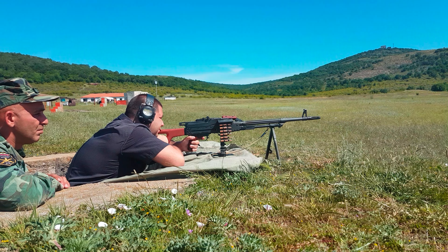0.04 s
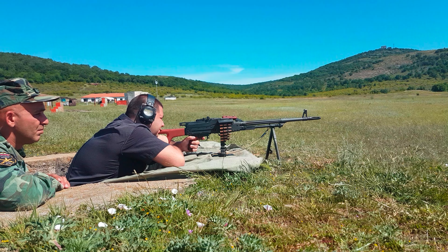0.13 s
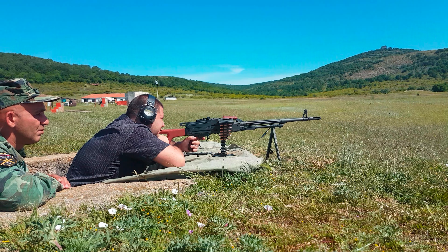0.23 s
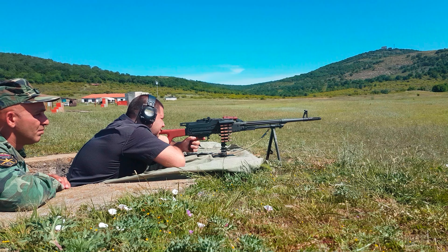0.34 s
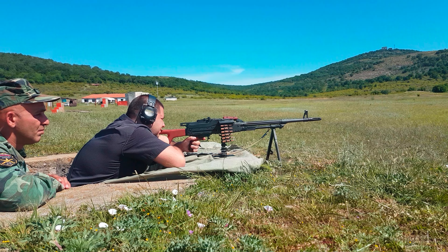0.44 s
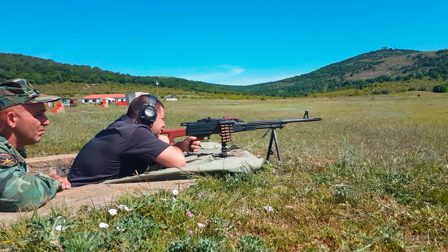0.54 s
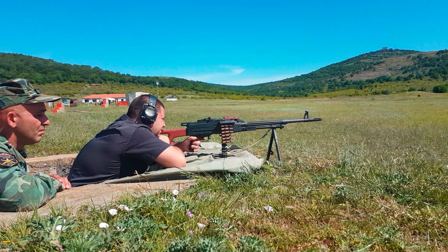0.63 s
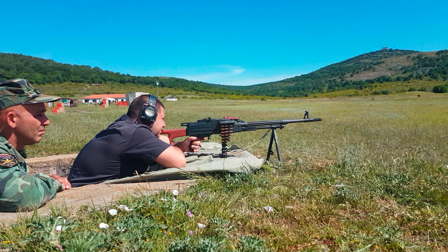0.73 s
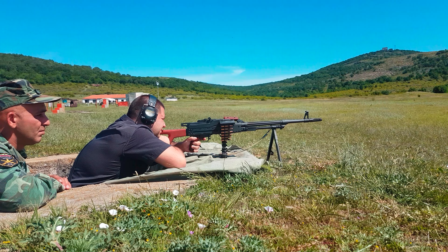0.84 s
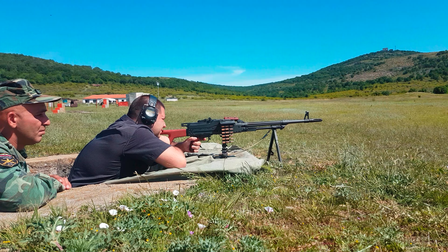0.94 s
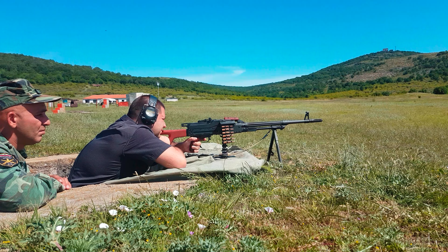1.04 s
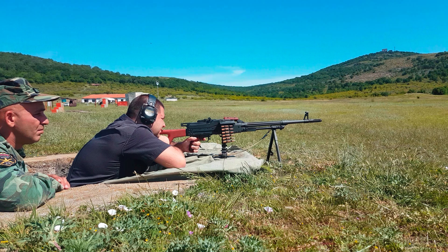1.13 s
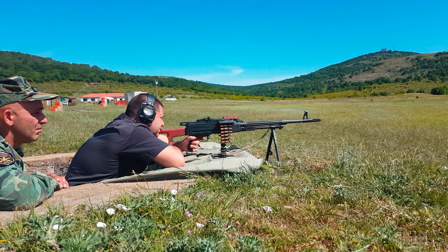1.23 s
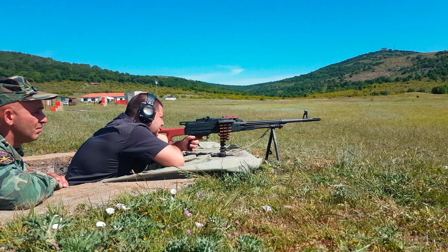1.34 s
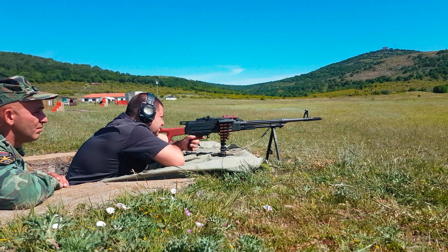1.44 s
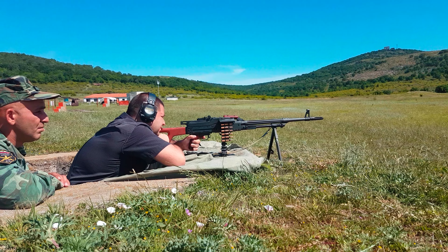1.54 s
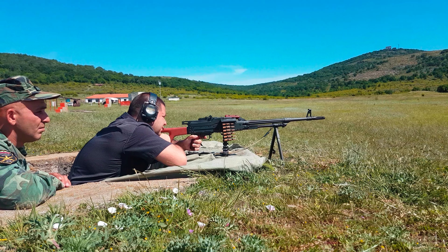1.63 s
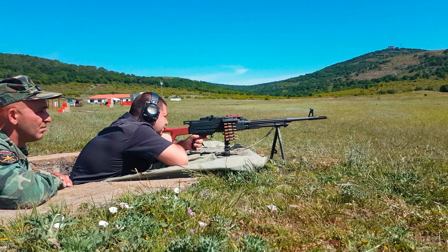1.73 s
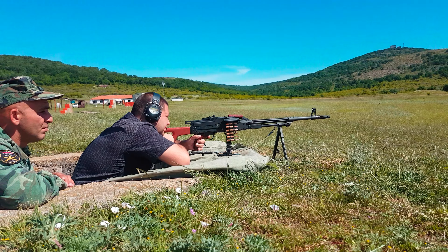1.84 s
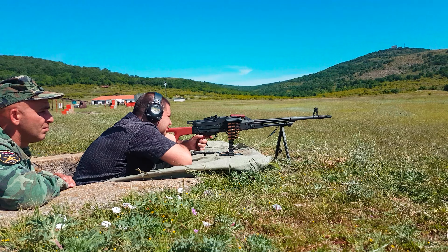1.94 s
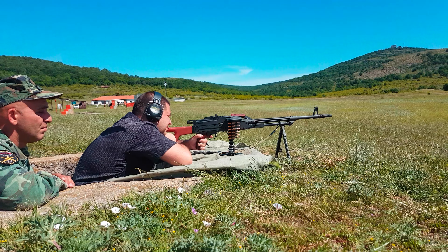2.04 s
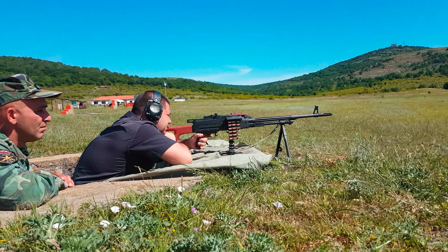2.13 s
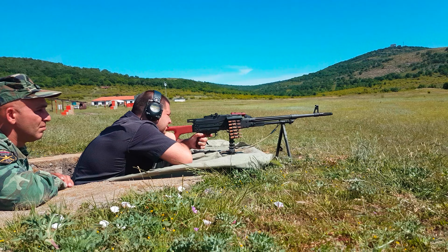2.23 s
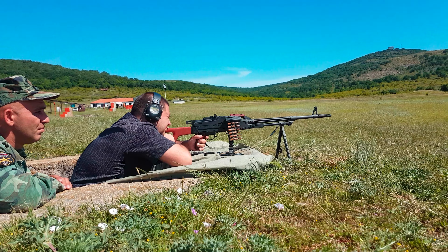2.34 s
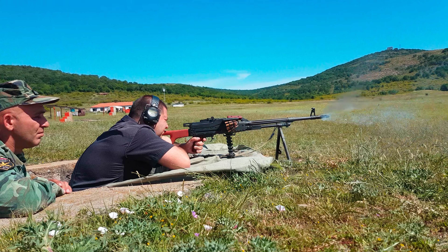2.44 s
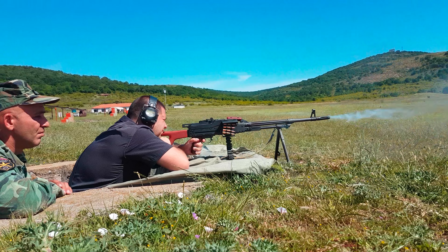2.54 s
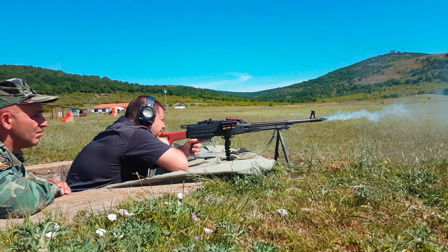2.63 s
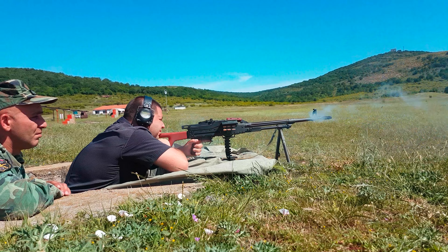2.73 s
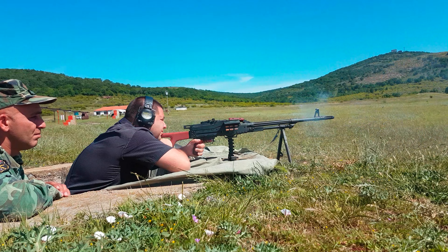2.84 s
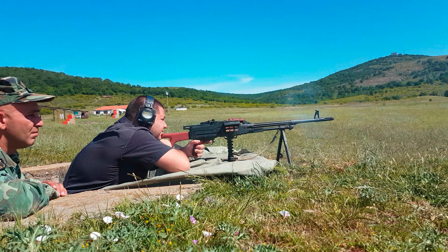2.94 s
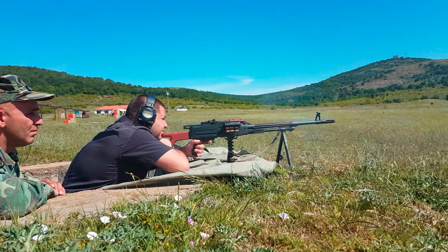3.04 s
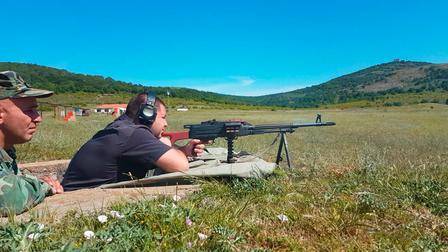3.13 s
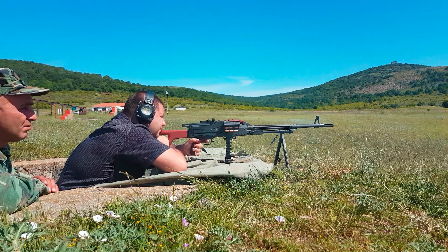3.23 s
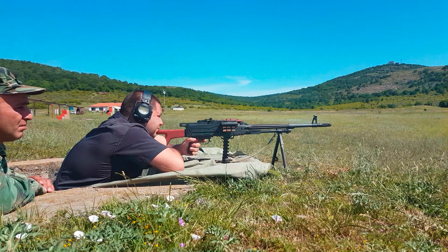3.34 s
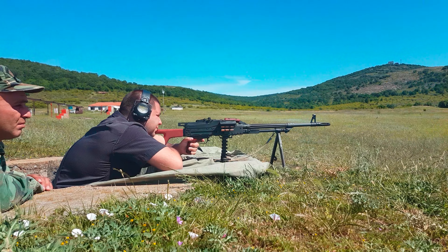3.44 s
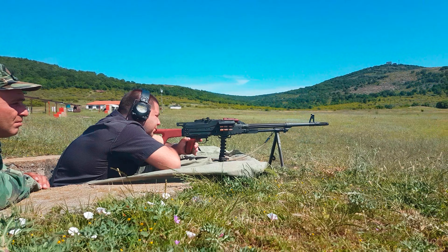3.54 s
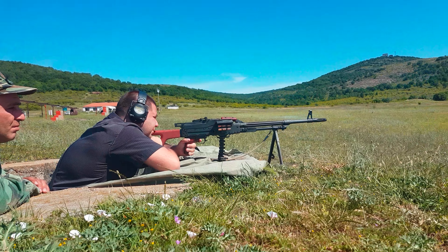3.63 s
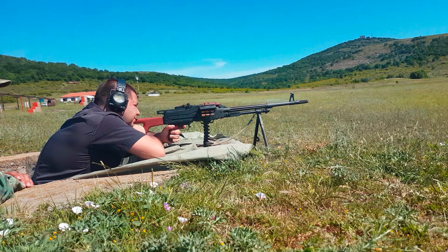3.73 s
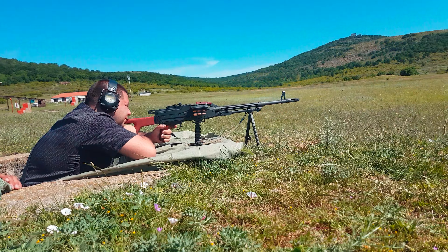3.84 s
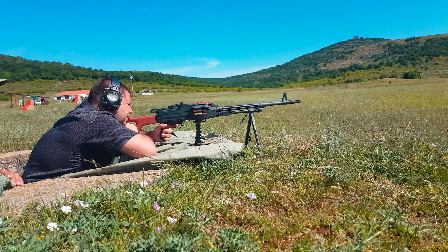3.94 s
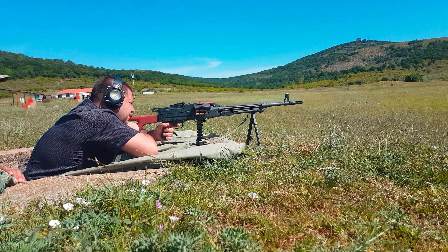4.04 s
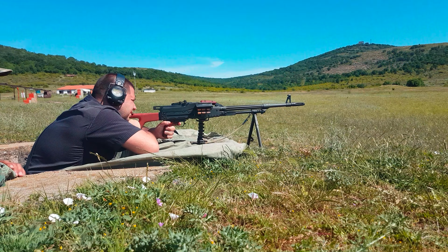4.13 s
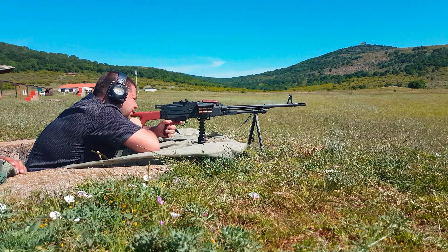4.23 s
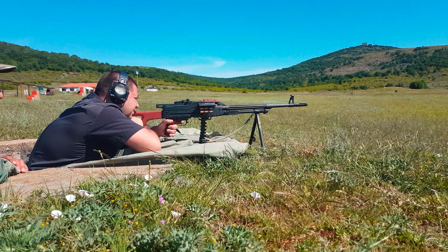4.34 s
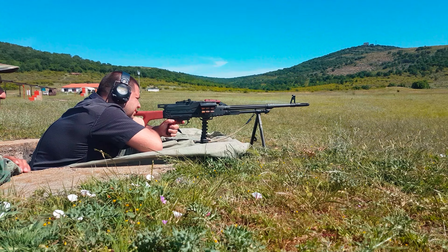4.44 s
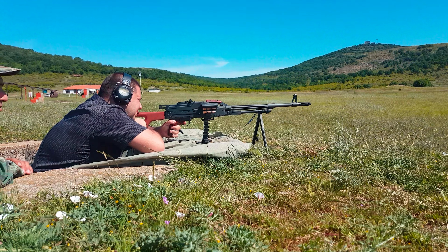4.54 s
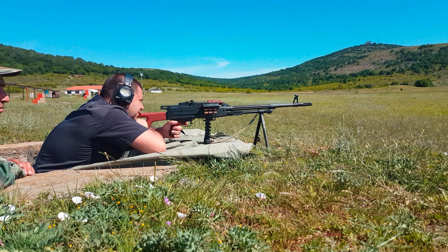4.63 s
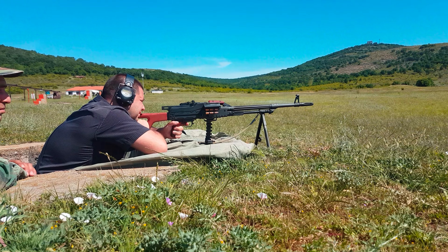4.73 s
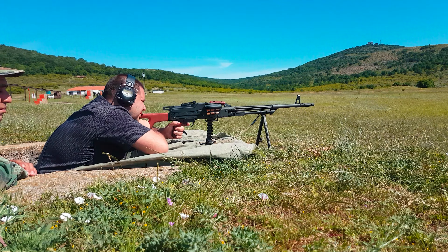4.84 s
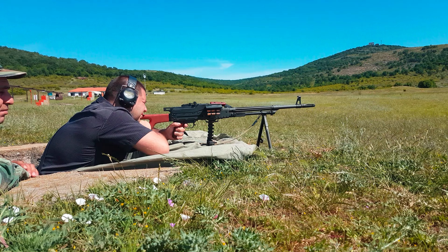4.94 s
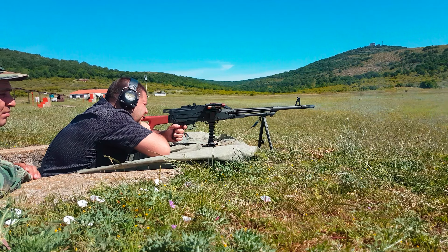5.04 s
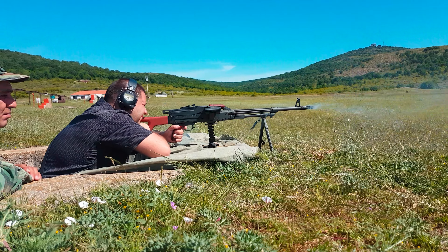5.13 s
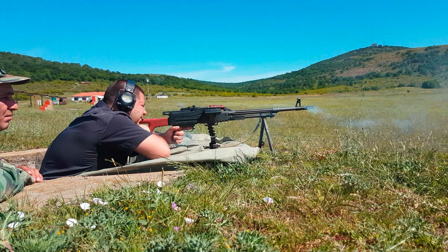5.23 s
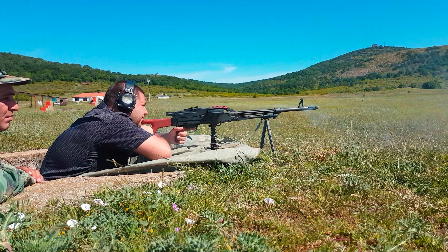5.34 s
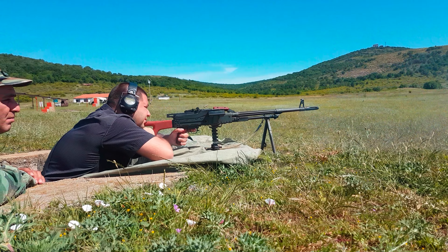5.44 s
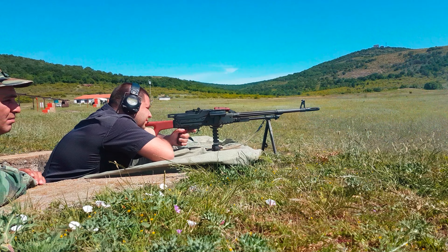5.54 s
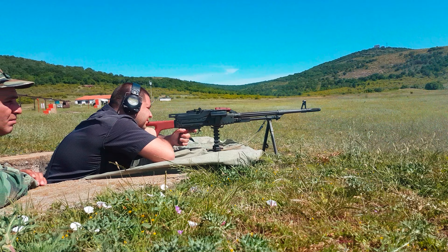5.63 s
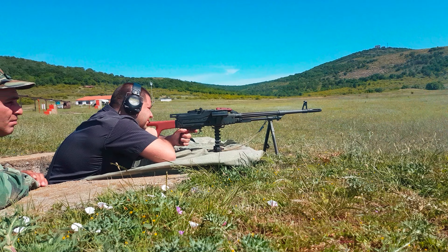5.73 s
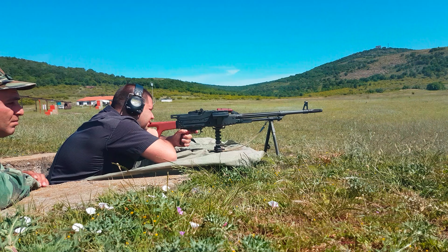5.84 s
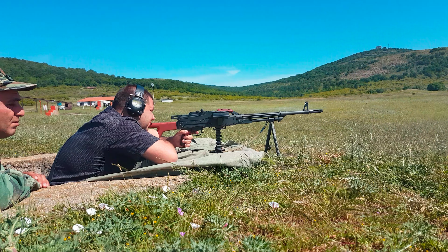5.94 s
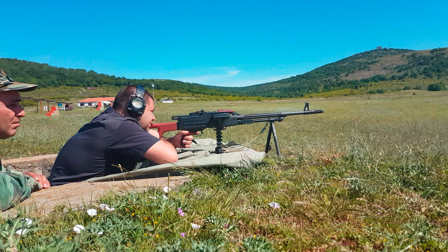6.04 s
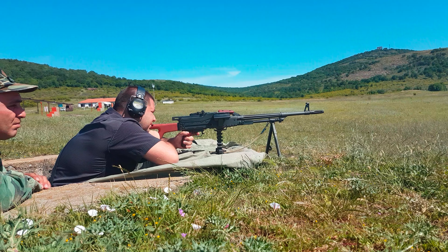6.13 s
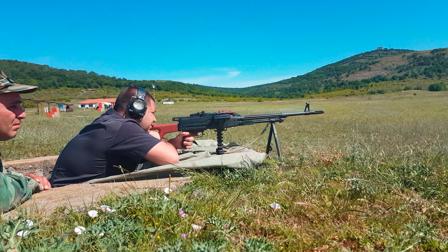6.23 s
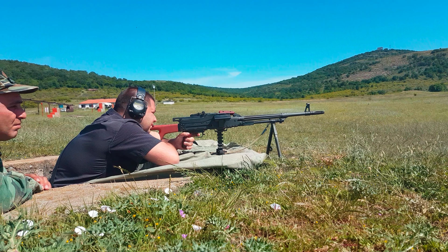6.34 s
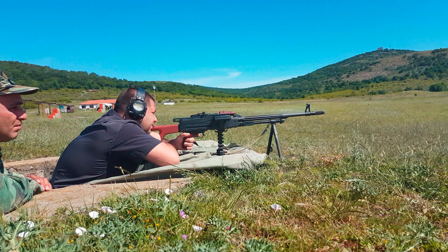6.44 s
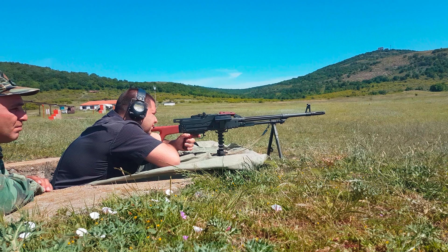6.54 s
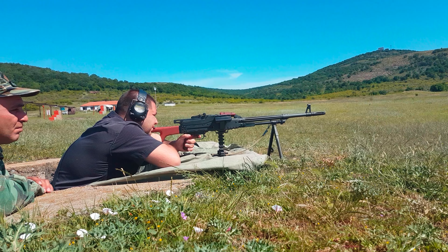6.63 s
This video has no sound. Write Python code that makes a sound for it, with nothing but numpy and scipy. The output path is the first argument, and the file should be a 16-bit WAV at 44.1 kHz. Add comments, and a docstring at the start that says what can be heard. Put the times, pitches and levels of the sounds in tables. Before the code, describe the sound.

An open shooting range in a valley, heard in stereo from a few metres beside a belt-fed machine gun. At the start a thin, high steel ring dies away over fluttering, rolling gunfire echoes and uneven low wind thumps, mostly on the right. A dull far shot knocks at 1.25 s; rough close scrapes follow around 1.5-2.1 s. At about 2.4 s the bolt slams forward and four shots crack within 0.3 s, roughly twelve a second, harsh and boomy, clipping, with close reflections, buffer clacks and bright ringing steel. A far bank answers about a third of a second later and the wash fades. From 3 to 4.4 s come small ticks and soft cloth swishes. Another far shot at 4.8 s, then a three-shot burst at 5.07-5.24 s rings out with ticks. Fainter far shots sound near 5.9 and 6.15 s as the roar swells again.

```python
"""Wind thumps both microphone ports while a steel ring dies away and gunfire rolls on in the valley.
Single shots come from afar, and rough scrapes and a rustle of cloth sound close by.
Then a belt-fed machine gun fires a short burst a few metres away: its bolt runs home, noise and low swings
make each blast, walls close by and a far bank answer, and a steel part rings on. Small ticks follow.
A second short burst and more far shots come later; the loudest peaks clip."""
import sys
import numpy as np
from scipy.fft import rfft, irfft, next_fast_len
from scipy.io import wavfile
from scipy.ndimage import uniform_filter1d, map_coordinates

SR = 44100
rng = np.random.default_rng(int(sys.argv[2]) if len(sys.argv) > 2 else 0)


def master(y):
    """Save y as 16-bit WAV."""
    cut = np.clip(np.atleast_2d(y).T, -1, 1)
    pcm = np.round(cut * 32767)  # scale
    wavfile.write(sys.argv[1], SR, pcm.astype(np.int16))


N = 295029  # length in samples
LAG, BOOM_LAG = 0.000397, .0003  # the gun reaches the left port first; low swings lag less (s)

# In the tables "fade" is the time a sound takes to fall by 60 dB.
# A "colour" says how strong a noise is at each pitch. Each row: pitch in Hz, relative level in dB.


def amp(db):
    """Turns decibels into a plain factor."""
    return 10 ** (np.asarray(db) / 20)


def unit(x):
    """Scales a signal to an rms of 1."""
    return x / np.sqrt(np.mean(x ** 2) + 1e-20)


def pan(db):
    """Left and right gains for a left-right difference; a positive one leans left."""
    return amp([db / 2, -db / 2])


def curves(rows):
    """One value per sample for each column after the time."""
    s, *columns = np.transpose(rows)
    return [np.interp(np.arange(N) / SR, s, column) for column in columns]


def wobble(rate):
    """A smooth random curve per channel, rate knots a second."""
    knots = rng.standard_normal((2, int(N * rate / SR) + 4))
    places = np.arange(N) * rate / SR
    return np.array([map_coordinates(row, [places]) for row in knots])


def filtered(x, response):
    """x times a complex response of frequency."""
    m = next_fast_len(N + SR // 4)  # room to spare, so that the end does not wrap to the start
    return irfft(rfft(x, m) * response(np.fft.rfftfreq(m, 1 / SR)), m)[..., :N]


def rush(spectrum, alike, lag=0, lumps=1):
    """Stereo noise of rms 1 with a colour, a left-right likeness and a delay of the right side (s)."""
    f, db = np.transpose(spectrum)
    turn = np.arccos(np.clip(alike, -1, 1)) / 2
    a, b = rng.standard_normal((2, N))
    shared, differing = np.cos(turn) * a, np.sin(turn) * b
    pair = lumps * np.array([shared + differing, shared - differing])

    def response(hz):
        colour = amp(np.interp(np.log(hz + 1), np.log(f + 1), db, -120, -120))
        return colour * np.exp(-2j * np.pi * np.outer([0, lag], hz))

    return unit(filtered(pair, response))


def add(out, s, sound):
    """Mixes a sound in at time s."""
    i = round(s * SR)
    part = sound[..., max(-i, 0):max(N - i, 0)]
    out[..., max(i, 0):max(i, 0) + part.shape[-1]] += part


def puffs(rows):
    """The envelope of noise bursts (s, dB, rise s, fade s), whose powers add."""
    power = np.zeros(N)
    for s, db, rise, fade in rows:
        t = np.arange(int(fade * SR * 2)) / SR
        add(power, s, (amp(db - 60 * t / fade) * (1 - np.exp(-t / rise))) ** 2)
    return np.sqrt(power)


def ring(modes, rise, length):
    """Damped sines (Hz, dB, fade s) that start from rest."""
    t = np.arange(int(length * SR)) / SR
    sines = sum(amp(db - 60 * t / fade) * np.sin(2 * np.pi * hz * t) for hz, db, fade in modes)
    return sines * (1 - np.exp(-t / rise))


def strokes(rows, size):
    """The envelope of steady strokes (start s, end s, dB) with edges size samples long."""
    t = np.arange(N) / SR
    steps = sum(amp(db) * ((t > start) & (t < end)) for start, end, db in rows)
    return uniform_filter1d(steps, size=size)


# The near gun's shots. Each row: start in seconds, level of the shot in dB, level of its steel ring in dB,
# extra dB for the upper tones of that ring.
SHOTS = [(2.4374, -1.5, -26, 3), (2.5256, -5.5, -31, -3), (2.611, -6.5, -32, -6.5), (2.696, -6, -28, 0.5),
         (5.069, -2, -26, 2.5), (5.152, -6, -26.5, -1.5), (5.2378, -6.5, -24.5, 9)]


def bursts():
    """Times of the first and of the last shot of each burst; over half a second of pause parts two bursts."""
    s = np.array([row[0] for row in SHOTS])
    pause = np.diff(s) > .5
    return s[np.r_[True, pause]], s[np.r_[pause, True]]


def train(parts):
    """The envelope of all shots, each made of the same parts (delay s, dB, rise s, fade s)."""
    return puffs([(s + delay, db + level, rise, fade)
                  for s, db, *_ in SHOTS for delay, level, rise, fade in parts])


def gritty(depth_db, rate):
    """Quick random ups and downs that roughen the noise of a shot."""
    return amp(2.3 * wobble(500) + depth_db * wobble(rate))


# Tones of the steel part. Each row: pitch in Hz, level in dB, fade in seconds.
STEEL_TONES = [(7424, -13, .5), (7457, -16, .75), (7566, 0, .66), (8247, -12, .52), (8882, -8, .48),
               (9950, -10, .1), (15110, -16, .34)]
# A ring still dying at the start: time in seconds, level in dB, extra dB for the upper tones.
EARLIER_RING = (-0.49, -39, 0)


def steel_ring():
    """The recoiling bolt strikes a steel part; the next blow stops the ring and starts it anew."""
    tone = np.zeros(N + 2 * SR)
    blows = [EARLIER_RING] + [(s + .025, db, upper_db) for s, _, db, upper_db in SHOTS]
    for s, db, upper_db in blows:
        modes = [(hz, db + level + upper_db * (hz > 8500), fade) for hz, level, fade in STEEL_TONES]
        blow = ring(modes, 0.014, 1.5)
        i = round(s * SR)
        tone[max(i, 0):i + len(blow)] = blow[max(-i, 0):]  # replaces the old ring
    late = np.roll(tone, round(LAG * SR))
    return pan(2)[:, None] * amp(1.9 * wobble(51)) * np.array([tone[:N], late[:N]])


# The roar's loudness. Each row: time in seconds, then the levels of the middle, upper and lower band in dB.
ROLL = [(0, -47.5, -59.5, -56), (.25, -53.5, -68, -64.5), (.75, -56, -70, -61), (1.01, -54.5, -68.5, -54.5),
        (1.23, -57.5, -71, -63), (1.3, -47, -57, -56), (1.73, -49.5, -57, -52.5), (2.35, -58.5, -72, -55.5),
        (2.82, -44, -53, -58), (3.14, -62.5, -64.5, -64), (3.44, -57, -66, -63), (3.74, -46.5, -57, -51),
        (4.02, -50.5, -62.5, -63.5), (4.3, -45, -63.5, -71), (4.85, -49.5, -61.5, -56),
        (5.36, -53.5, -50.5, -61.5), (5.75, -63.5, -67, -66.5), (6.05, -54, -64, -55.5),
        (6.36, -42, -52.5, -50), (6.69, -46.5, -57, -52.5)]
# The middle band drifts upward, then sinks partway back near the end. Each row: time in seconds,
# share of the higher colour from 0 to 1.
LIFT = [(0, .05), (2.2, .15), (2.9, .6), (4.5, .7), (5.6, .95), (6.3, .5), (6.69, .5)]
# Colours of the middle band and of the same band lying higher. Each row: pitch in Hz, relative level in dB.
MIDDLE, LIFTED = [(1050, -33), (1450, -7), (2000, -4), (2450, -6), (2800, -19)], [(1250, -35.5), (1700, -8), (2200, -2.5), (2800, -4), (3150, -19)]
# Colours of the upper and the lower band. Each row: pitch in Hz, relative level in dB.
UPPER, LOWER = [(1760, -33.5), (3000, -3.5), (4150, -11), (6200, -27), (8000, -39.5), (10400, -68.5),
                (17600, -120)], [(290, -40), (500, -12.5), (792, -9), (1500, -4), (1950, -26.5), (3300, -120)]
VALLEY_LAG = -.00045  # the roar reaches the right port first (s)


def valley():
    """Echoes of gunfire smear into a fluttering roar of three noise bands."""
    middle_db, upper_db, lower_db = curves(ROLL)
    lift = np.clip(curves(LIFT)[0], 0, 1)
    middle = np.sqrt(1 - lift) * rush(MIDDLE, 0.5, VALLEY_LAG)
    middle += np.sqrt(lift) * rush(LIFTED, 0.5, VALLEY_LAG)
    upper = rush(UPPER, 0.21, VALLEY_LAG)
    lower = rush(LOWER, 0.2, VALLEY_LAG, lumps=amp(2.4 * wobble(60)))
    roar = amp(middle_db) * middle + amp(upper_db) * upper + amp(lower_db) * lower
    flutter = amp(1.2 * wobble(40) + 1.7 * wobble(150))
    return pan(5.2)[:, None] * flutter * roar


# The wind's strength. Each row: time in seconds, level in dB, left-right difference in dB.
WIND = [(0, -53, -12), (.08, -45, -14), (.26, -51, -15), (.52, -46, -12), (.65, -50, -16),
        (1.15, -41, -17.5), (1.22, -43.5, -14), (1.3, -33, -14), (1.45, -47.5, -10.5), (1.64, -50, -0.5),
        (1.75, -44, -17.5), (2.35, -50.5, -7), (2.92, -49, -4.5), (3.2, -67.5, 0), (3.89, -51.5, -11.5),
        (4.12, -57, -2.5), (4.5, -39, -6.5), (4.77, -47, -1.5), (4.97, -38.5, -6), (5.45, -53.5, 4.5),
        (5.85, -65, -9.5), (6.16, -52.5, -2), (6.42, -53.5, -12), (6.69, -58, -8.5)]
# Colour of the wind. Each row: pitch in Hz, relative level in dB.
RUMBLE = [(15, -53.5), (25, -14), (65, 3.5), (128, 2.5), (334, -4), (534, -12.5), (1200, -16.5),
          (1560, -38), (2640, -120)]


def wind():
    """Eddies thump each port on its own: a dense train of uneven pops swells a low rumble."""
    buffet_db, side_db = curves(WIND)
    pops = (rng.random((2, N)) < 120 / SR) * rng.uniform(.3, 1, (2, N))  # about 120 a second
    lumps = (unit(uniform_filter1d(pops, size=60)) + .8) * amp(2.2 * wobble(25))
    return amp(buffet_db) * pan(side_db) * rush(RUMBLE, 0.34, lumps=lumps)


# Colour of the hiss. Each row: pitch in Hz, relative level in dB.
HISS = [(3530, -28.5), (6000, -0.5), (8150, -9), (10700, -7.5), (13200, -3), (15600, -1.5)]
HISS_DB = -73
SINK_DELAY, SINK_DB, SINK_RECOVERY = .2, -11.5, .5  # s after a burst, depth in dB, recovery time in s


def hiss():
    """A faint steady top end that drops away after a burst and creeps back."""
    since = np.arange(N) / SR - SINK_DELAY - bursts()[1][:, None]
    sunk = np.sum((since > 0) * np.exp(-np.abs(since) / SINK_RECOVERY), axis=0)
    return amp(HISS_DB + SINK_DB * sunk) * rush(HISS, 0)


# Single far shots and their slaps. Each row: start in seconds, level in dB.
FAR = [(1.243, -9), (1.28, -27), (1.306, -26.5), (1.455, -35.5), (3.252, -43.5), (4.696, -43.5),
       (4.794, -13.5), (4.822, -26.5), (5.879, -30), (5.981, -43), (6.054, -42.5), (6.067, -37),
       (6.15, -19.5), (6.215, -32)]
# Tones of the dull swing. Each row: pitch in Hz, level in dB, fade in seconds.
FAR_SWING = [(577, -3, 0.014), (935, -5.5, 0.014), (1278, -1, .018), (1705, -10.5, 0.024)]
# Colour of the short wash. Each row: pitch in Hz, relative level in dB.
SLAP = [(120, -44), (200, -23.5), (505, -2), (778, -10), (894, -16.5), (1010, -5), (1360, -9.5),
        (4450, -28.5), (8000, -47), (10400, -93), (17600, -120)]
BANK_DELAY, BANK_DB = .343, -31  # a far bank answers every near shot: delay in s, dB under the shot
FAR_WASH_DB, FAR_WASH_FADE = -11, .12  # dB under the far shot's level, fade in s


def far_shots():
    """Distance leaves a dull swing and a short wash; the bank's answers sound alike."""
    heard = FAR + [(s + BANK_DELAY, db + BANK_DB) for s, db, *_ in SHOTS]
    out = puffs([(s, db + FAR_WASH_DB, .001, FAR_WASH_FADE) for s, db in heard]) * rush(SLAP, 0.21)
    for s, db in heard:
        modes = [(hz * rng.normal(1, .03), db + level, fade) for hz, level, fade in FAR_SWING]
        add(out, s + .0008, ring(modes, .0002, .05))  # the wash leads the swing a little
    return out


# Rough swells. Each row: start in seconds, end in seconds, level in dB.
SCRAPES = [(1.515, 1.585, -43.5), (1.615, 1.71, -44.5), (1.86, 1.94, -55), (2.04, 2.11, -47.5),
           (3.745, 3.8, -47.5)]
# Colour of the swells. Each row: pitch in Hz, relative level in dB.
ROUGH = [(800, -33), (1200, 4.5), (2000, 4), (2900, -4), (4200, -6), (5200, -27), (6500, -48)]


def scrapes():
    """Rough swells close by: soft-edged strokes of lumpy noise."""
    return strokes(SCRAPES, size=500) * rush(ROUGH, 0.11, lumps=amp(2.7 * wobble(150)))


# Swishes of cloth. Each row: start in seconds, end in seconds, level in dB.
SWISHES = [(2.04, 2.058, -65), (3.254, 3.3, -76.5), (3.32, 3.406, -68), (3.526, 3.604, -56.5),
           (3.626, 3.686, -62), (3.741, 3.871, -57.5), (4.183, 4.199, -66), (4.405, 4.42, -51.5),
           (4.972, 4.982, -48.5)]
# Colour of the cloth. Each row: pitch in Hz, relative level in dB.
CLOTH = [(2060, -2.5), (3500, -0.5), (5950, -26), (6290, -22), (11500, -17), (12900, -12), (15600, -20.5)]


def cloth():
    """Brief swishes of cloth on the right: unsteady strokes of bright noise."""
    return pan(-17.5)[:, None] * strokes(SWISHES, size=200) * amp(1.6 * wobble(70)) * rush(CLOTH, .1)


# The low rumble of each shot: delay in seconds, level in dB, rise in seconds, fade in seconds.
THUD = (-0.11, -21, 0.57, .5)
# Colour of the rumble. Each row: pitch in Hz, relative level in dB.
DEEP = [(30, -26), (65, -4), (150, -6), (300, -2.5), (450, -7.5), (700, -34)]


def low_rumble():
    """Deep noise around each shot that begins just before it, swells slowly and lingers."""
    return train([THUD]) * rush(DEEP, 0.78, BOOM_LAG)


# Before a burst the bolt runs forward and strikes home. Each row: seconds from the first shot
# (negative is earlier), level in dB, fade in seconds.
RUN_UP = [(-.067, -22.5, .14), (-.05, -19, .13), (-.037, -14, .07), (-.02, -21, .07), (-.009, -5, .053)]
# Within a burst it strikes home more softly: seconds from the shot, level in dB, fade in seconds.
HOME = (-0.0062, -16.5, 0.13)
# Colour of the bolt's noise. Each row: pitch in Hz, relative level in dB.
STEEL = [(120, -49.5), (200, -20), (345, -21.5), (525, -2), (756, -12.5), (1950, -8), (2430, -8.5),
         (2810, -23.5), (3890, -2.5), (5030, -15.5), (6980, -11), (9340, -24.5), (15600, -16)]


def bolt_runs_home():
    """The bolt runs home before each shot: quick puffs of gritty metallic noise."""
    first = bursts()[0]
    moves = []
    for s, *_ in SHOTS:
        steps = RUN_UP if s in first else [HOME]
        moves += [(s + lead, db, .002, fade) for lead, db, fade in steps]
    return pan(3.9)[:, None] * puffs(moves) * rush(STEEL, 0.4, LAG, amp(2.2 * wobble(500)))


# Bright noise of one shot: muzzle crack, then a wall's answer. Each row: delay in seconds, level in dB,
# rise in seconds, fade in seconds.
CRACKS = [(0, 2, .0002, .012), (0, -3.5, .001, 0.067), (.004, 2.5, 0.005, 0.05), (.027, -5.5, 0.00072, .08),
          (0.036, -18, 0.0074, 0.33)]
# Colour of the crack. Each row: pitch in Hz, relative level in dB.
CRACK = [(180, -49), (300, -1), (893, -4), (1820, -3.5), (4290, -7.5), (5680, -10), (7520, -13),
         (8160, -16.5), (9950, -16.5), (13200, -6), (15600, -11.5)]


def cracks():
    """The sharp crack at the muzzle and its answer from a wall, as bright gritty noise."""
    return amp(-2.5) * pan(-1.5)[:, None] * train(CRACKS) * rush(CRACK, 0.1, LAG, gritty(2.7, 1500))


# Duller noise of one shot: the blast, its ground bounce, a wall's answer and the near wash. Each row:
# delay in seconds, level in dB, rise in seconds, fade in seconds.
BLASTS = [(0, -3.5, 0.00096, 0.13), (.012, 0.5, 0.0043, 0.066), (.027, -5, 0.0016, 0.056),
          (.03, -21.5, 0.012, 0.47)]
# Colour of the blast. Each row: pitch in Hz, relative level in dB.
BLAST = [(59, -35.5), (100, -12.5), (135, -30.5), (360, -6.5), (426, -10), (477, -9.5), (808, -10),
         (2450, -14.5), (6910, -25), (7320, -23.5), (9000, -32.5), (11700, -68.5), (19800, -120)]


def blasts():
    """The body of the blast and its first reflections, as duller gritty noise."""
    return pan(4.8)[:, None] * train(BLASTS) * rush(BLAST, 0.2, LAG, gritty(1.6, 150))


# Low swings that reach the ears one after another. Each row: delay in seconds, level in dB,
# pitch in Hz, fade in seconds, left-right difference in dB.
BOOMS = [(0, -9, 599.6, .015, -14.5), (.0095, 4.5, 388, 0.03, -1), (.0135, 1.5, 578.5, .04, 0),
         (0.021, -5, 456, 0.03, 7), (.027, -10, 371, 0.066, -8.5), (0.04, -4, 305.4, 0.049, 5.5),
         (.047, -13, 210, .06, 2), (.056, -20.5, 264.6, .1, 3.5), (.068, -22.5, 180.7, 0.12, 5.5),
         (.003, -29, 68, 0.25, -2.5)]


def booms():
    """Pressure swings after each shot: damped low sines whose pitch and level vary a little by chance."""
    out = np.zeros((2, N))
    for s, db, *_ in SHOTS:
        for delay, level, hz, fade, side_db in BOOMS:
            chance_hz, chance_db = rng.normal(0, [.015 * hz, 1.2])
            swing = amp(db + 1) * ring([(hz + chance_hz, level + chance_db, fade)], 0.002, .15)
            left, right = pan(side_db)
            add(out[0], s + delay, left * swing)
            add(out[1], s + delay + BOOM_LAG, right * swing)
    return out


# The bolt hits its buffer and two small rattles follow. Each row: seconds after the shot, level in dB.
STOPS = [(.0725, -9.5), (.131, -26), (.177, -28)]
# Tones of a hit. Each row: pitch in Hz, level in dB, fade in seconds.
BUFFER = [(1280, -6, 0.02), (2630, -9, .025)]
# Colour of a hit's noise. Each row: pitch in Hz, relative level in dB.
CLACK = [(290, -30.5), (500, -4.5), (2500, -1.5), (3630, -17.5), (6980, -13.5), (7510, -9), (9000, -18),
         (11700, -47.5), (19800, -120)]
CLACK_DB = -7  # the noise of a hit against the hit's level


def bolt_stops():
    """The bolt hits its buffer after every shot: a clack of noise and two damped tones."""
    hits = [(s + delay, db) for s, *_ in SHOTS for delay, db in STOPS]
    noise = puffs([(s, db + CLACK_DB, .0003, .04) for s, db in hits])
    out = pan(2.2)[:, None] * noise * rush(CLACK, 0.93, LAG)
    for s, db in hits:
        add(out, s, amp(db + rng.normal(0, 1.5)) * ring(BUFFER, .0003, .04))
    return out


# The long wash of each shot: delay in seconds, level in dB, rise in seconds, fade in seconds.
FIELD = (0.09, -38.5, 0.2, 1.53)
# Colour of the wash. Each row: pitch in Hz, relative level in dB.
WASH = [(800, -30), (1200, -9), (1700, -12), (2300, 0.5), (3300, -14), (4500, -4), (5400, -15), (6300, -11),
        (7200, -26), (9000, -50)]


def field_wash():
    """Each shot washes over the range: noise that swells slowly and fades in an uneven flutter."""
    return pan(3.2)[:, None] * train([FIELD]) * rush(WASH, 0.28, LAG, amp(3.8 * wobble(120)))


# Short mid ticks on the left. Each row: start in seconds, level in dB.
PATTER = [(3.076, -44), (3.138, -44.5), (3.161, -43), (3.189, -47), (3.223, -38), (4.089, -47),
          (5.362, -24.5), (5.598, -43), (5.68, -42), (5.703, -42), (5.762, -47.5)]
PATTER_HZ = 2240  # middle of the random pitches
MORE_FROM, MORE_TO = .2, 0.4  # more ticks, about as loud, scatter this long after each burst (s)
MORE_DB, MORE_SPREAD_DB = -43, 1


def patter():
    """Short mid ticks: four damped sines of random pitch each; eight more at random times after each burst."""
    out = np.zeros((2, N))
    more = [(s + rng.uniform(MORE_FROM, MORE_TO), rng.normal(MORE_DB, MORE_SPREAD_DB))
            for s in np.repeat(bursts()[1], 8)]
    for s, db in PATTER + more:
        pitches = PATTER_HZ * np.exp(rng.normal(0, 0.14, size=4))
        add(out, s, pan(4)[:, None] * ring([(hz, db, .01) for hz in pitches], 0.00072, .03))
    return out


# Bright ticks. Each row: start in seconds, level in dB, rough pitch in Hz, left-right difference in dB.
TICKS = [(2.9634, -40.5, 7580, -7), (3.7064, -45.5, 4750, 25), (3.7618, -38.5, 4000, -11),
         (3.954, -43.5, 5350, 5), (4.0286, -39, 8360, -13.5), (4.147, -35, 13100, -7),
         (4.2084, -35.5, 7010, -9), (4.301, -48, 6420, -1), (4.343, -46, 7500, 0), (4.35, -38, 6280, 13),
         (4.3765, -51.5, 6980, 16), (6.2914, -49, 4060, 4)]
TICK_MODE_DB = -11  # each of a tick's many tones against the tick's level


def ticks():
    """Bright ticks close by: sixteen very short damped sines of scattered pitch, a few rough cycles each."""
    out = np.zeros((2, N))
    for s, db, hz, side_db in TICKS:
        pitches = np.minimum(hz * np.exp(rng.normal(.1, 0.35, size=16)), SR / 2)
        modes = [(pitch, db + TICK_MODE_DB, .006) for pitch in pitches]
        add(out, s, pan(side_db)[:, None] * ring(modes, 0.00021, .03))
    return out


def scene():
    """All sounds together, in the order in which they first appear."""
    out = steel_ring() + valley() + wind() + hiss()
    out += far_shots() + scrapes() + cloth()
    out += low_rumble() + bolt_runs_home() + cracks() + blasts() + booms()
    out += bolt_stops() + field_wash()
    return out + patter() + ticks()


TOP_HZ = 15708  # band limit of the input


def record(dry):
    """The input rounds off and clips near full scale and keeps nothing above its band limit."""
    rounded = dry / (1 + np.abs(dry / 1.1) ** 6) ** (1 / 6)
    clipped = np.clip(rounded, -.95, .95)
    return filtered(clipped, lambda hz: hz < TOP_HZ)


dry = scene()
out = record(dry)
master(out)
```